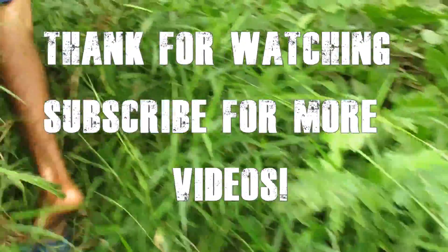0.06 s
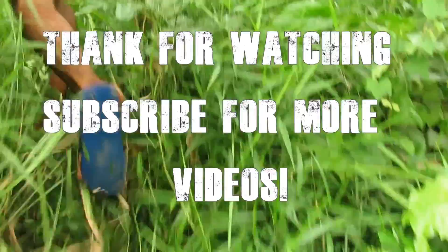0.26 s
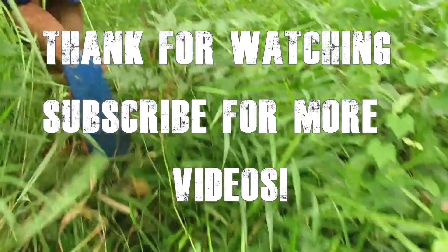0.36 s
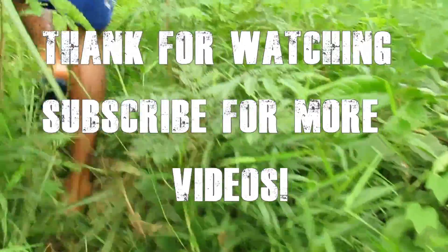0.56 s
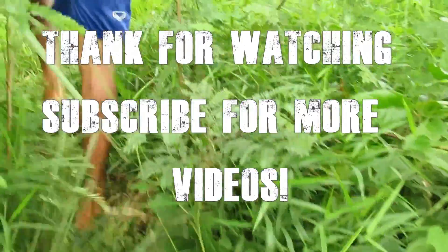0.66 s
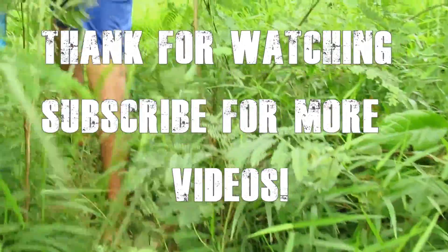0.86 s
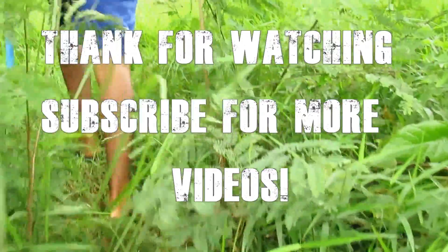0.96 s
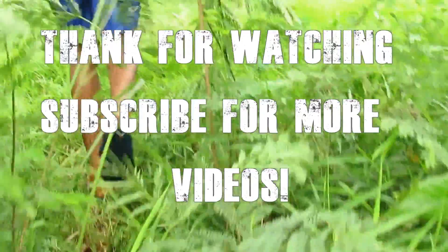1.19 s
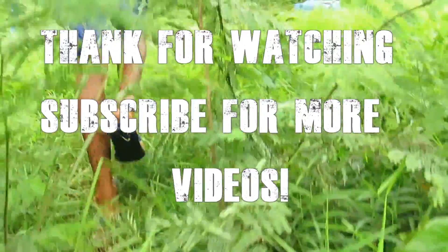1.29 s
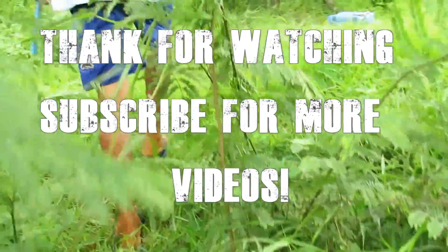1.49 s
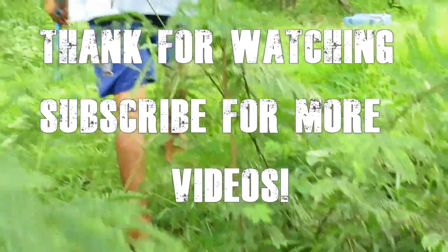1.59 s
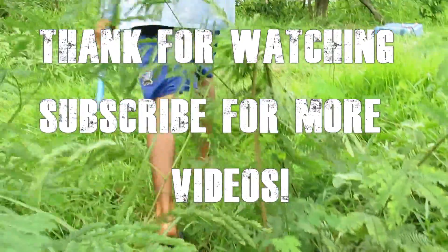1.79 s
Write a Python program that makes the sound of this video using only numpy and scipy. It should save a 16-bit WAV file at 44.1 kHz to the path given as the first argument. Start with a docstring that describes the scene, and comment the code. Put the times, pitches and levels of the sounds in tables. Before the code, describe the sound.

Tall grass swishes and crackles against walking legs, with wind rumbling on the microphone.

```python
"""Tall grass and weeds swish along the legs of someone wading through them.
Stalks bend and rustle, leaf edges scrape and fizz, and stems snap and crunch underfoot.
Moving air buffets the microphone of a hand-held camera close behind in low, lumpy gusts,
and a few jolts add dull thumps. Rubbing and wind are shaped noise; snaps and thumps are short waves."""
import sys
import numpy as np
from scipy import signal
from scipy.fft import rfft, irfft, next_fast_len
from scipy.io import wavfile
from scipy.ndimage import uniform_filter1d, map_coordinates

SR = 44100
rng = np.random.default_rng(int(sys.argv[2]) if len(sys.argv) > 2 else 0)


def pcm_store(signal):
    """Save signal as 16-bit PCM."""
    levels = np.round(np.clip(np.atleast_2d(signal), -1, 1) * 32767)
    wavfile.write(sys.argv[1], SR, levels.astype(np.int16).T)


N = 81585
TOP_HZ = 15750  # highest frequency in the sound


def amp(db):
    """Turn decibels into a number to multiply by."""
    return 10 ** (np.asarray(db) / 20)


def unit(x):
    """Scale a signal to an average size (rms) of 1."""
    return x / np.sqrt(np.mean(x ** 2) + 1e-20)


def along(points, hz):
    """Read between (frequency, value) points on a logarithmic frequency axis."""
    freqs, values = np.transpose(points)
    return np.interp(np.log(hz + 1), np.log(freqs + 1), values)


def since(start):
    """Seconds since a moment, for every sample."""
    return np.arange(N) / SR - start


def curve(rows):
    """Join (time, value) points with straight lines."""
    return np.interp(since(0), *np.transpose(rows))


def wobble(per_s):
    """A smooth curve through per_s random values each second."""
    return map_coordinates(rng.standard_normal(2048), [np.arange(N) * per_s / SR], mode="wrap")


def noise():
    """Two channels of white noise, an even hiss."""
    return rng.standard_normal((2, N))


def filtered(x, response):
    """Multiply each frequency in x by response(frequency)."""
    size = next_fast_len(N + SR // 2)
    return irfft(rfft(x, size) * response(np.fft.rfftfreq(size, 1 / SR)), size)[..., :N]


def spread(pair, tone, likeness):
    """Give two noises a tone and blend them to stereo at rms 1; likeness 1 makes both sides equal."""
    def response(hz):
        angle = np.arccos(np.clip(along(likeness, hz), -1, 1)) / 2
        return amp(along(tone, hz)) * [np.cos(angle), np.sin(angle)]
    mid, side = filtered(pair, response)
    return unit(np.array([mid + side, mid - side]))


def grains(count, hz, scatter, cycles, size_db):
    """Tiny touches, each a fading ring with its own pitch, size and direction."""
    when, strength, direction = np.hsplit(rng.random((count, 3)), 3)
    pitch = np.clip(hz * np.exp(scatter * rng.standard_normal((count, 1))), 200, TOP_HZ)
    size = amp(-size_db * np.log(np.maximum(strength, .02)))
    age = np.arange(SR // 100)  # samples
    turns = pitch * age / SR
    rings = size * np.sqrt(pitch) * np.sin(2 * np.pi * turns) * np.exp(-turns / cycles)
    places = ((when * N).astype(int) + age).ravel()
    shares = np.cos(2 * np.pi * direction), np.sin(2 * np.pi * direction)
    return unit(np.array([np.bincount(places, (rings * share).ravel(), N)[:N] for share in shares]))


def patchy(x, depth_db):
    """Make narrow bands of a hiss swell and fade at random."""
    bands = signal.stft(x, nperseg=1024)[2]
    patches = rng.standard_normal(bands.shape[1:])
    for axis in (0, 1):  # smooth over frequency, then time
        patches = uniform_filter1d(patches, size=4, axis=axis)
    return signal.istft(bands * amp(depth_db * unit(patches)), nperseg=1024)[1][:, :N]


def burst(peak_s, fade_s, rise_s=0.002):
    """Rise quickly to a peak, then die away."""
    t = since(peak_s)
    return np.exp(np.minimum(t / rise_s, -t / fade_s))


# how loudly blades slide along the legs: t/s, relative level/dB
SWISH_LEVELS = [(0, -48), (.09, -47.5), (.17, -50), (.285, -40.5), (.41, -42.5), (.5, -47), (.586, -50),
                (.668, -45), (.87, -49.5), (.995, -46.5), (1.03, -50.5), (1.12, -44), (1.21, -39.5),
                (1.255, -50.5), (1.4, -51), (1.51, -54), (1.6, -50), (1.71, -45.5), (1.85, -45.5)]
# tone of the blades: f/Hz, relative level/dB
BLADE_TONE = [(120, -3), (250, -20), (420, -0.5), (720, 0), (1100, 2), (1900, 2.5), (3200, -2.5),
              (5000, -9.5), (8000, -17.5), (15000, -60)]
# how alike the blades sound left and right: f/Hz, likeness
BLADE_LIKENESS = [(150, 1), (300, 0.99), (600, 0.99), (1200, 0.93), (2500, 1), (5000, 0.32)]


def swish():
    """Blades rub on the legs in uneven slips, with small ticks on top."""
    ticks = amp(-15) * grains(count=2200, hz=1970, scatter=0.93, cycles=1.0, size_db=4)
    rub = noise() + ticks
    level_db = 2.5 + curve(SWISH_LEVELS) + 0.58 * wobble(per_s=59.87)
    return amp(level_db) * spread(patchy(rub, depth_db=1.85), BLADE_TONE, BLADE_LIKENESS)


# how loudly stalks bend near the ground: t/s, relative level/dB
STALK_LEVELS = [(0.0, -51), (0.246, -47.5), (0.488, -48), (0.716, -60.5), (0.972, -54.5), (1.112, -44.5),
                (1.236, -46), (1.364, -60), (1.612, -43.5), (1.766, -46), (1.85, -41)]
# tone of the stalks: f/Hz, relative level/dB
STALK_TONE = [(100, 1.5), (200, 2), (450, -0.5), (750, -11.5), (1200, -9.5), (3000, -23)]


def stalks():
    """Thicker stalks bend and drag with a soft, low rustle."""
    level_db = -1.5 + curve(STALK_LEVELS) + 4.5 * wobble(per_s=44.52)
    return amp(level_db) * spread(noise(), STALK_TONE, BLADE_LIKENESS)


# how loudly leaves brush past each other: t/s, relative level/dB
FIZZ_LEVELS = [(0, -43), (.092, -40), (.14, -45), (.2, -46.5), (.24, -39.5), (.33, -40.3), (.42, -39.5),
               (.59, -42), (.64, -37.5), (.68, -39.5), (.745, -38), (.88, -44.5), (.96, -42), (.995, -39.5),
               (1.075, -47.5), (1.18, -44.5), (1.33, -48.5), (1.45, -53), (1.53, -52.5), (1.65, -52),
               (1.82, -46), (1.85, -47.5)]
# tone of the leaves: f/Hz, relative level/dB
LEAF_TONE = [(400, -5), (1500, -10.5), (3500, 0.5), (5500, -0.5), (8000, -2), (10500, -.5), (13000, 3),
             (14400, 0), (15700, -10.5)]
# how alike the leaves sound left and right: f/Hz, likeness
LEAF_LIKENESS = [(1500, .7), (4000, .38), (8000, .42), (12500, .62)]


def fizz():
    """Leaf edges scrape each other, making a hiss full of fine crackle."""
    crackle = amp(-9.5) * grains(count=2400, hz=9600, scatter=0.37, cycles=0.83, size_db=1.5)
    scrape = noise() + crackle
    level_db = 3 + curve(FIZZ_LEVELS) + 1.07 * wobble(per_s=70.2)
    return amp(level_db) * spread(patchy(scrape, depth_db=2.96), LEAF_TONE, LEAF_LIKENESS)


# gusts on the microphone: t/s, relative level/dB
GUST_LEVELS = [(0, -73), (.07, -61), (.14, -40.5), (.18, -51), (.225, -45), (.25, -34.5), (.28, -30),
               (.295, -42), (.35, -47), (.405, -29), (.44, -43.5), (.485, -38.5), (.505, -30.5), (.61, -30),
               (.655, -27), (.685, -43.5), (.75, -28), (.795, -45), (.83, -40), (.89, -48), (.98, -39.5),
               (1.115, -41.5), (1.15, -39), (1.215, -28.5), (1.245, -26), (1.31, -24.5), (1.345, -24.5),
               (1.385, -29), (1.455, -23.5), (1.48, -34.5), (1.6, -41.5), (1.69, -41), (1.76, -57),
               (1.85, -60)]
# tone of the big swirls of air, then of the small ones: f/Hz, relative level/dB
SWIRL_TONE = [(18, -2.5), (30, -13.5), (45, -0.5), (75, 2.5), (110, -9), (165, -16), (215, -30),
              (300, -39.5), (600, -38), (2000, -93)]
FLUTTER_TONE = [(30, -26), (60, -29), (100, -6), (160, -7), (210, -12.5), (270, -16), (400, -32),
                (1000, -55)]
# how alike each kind sounds left and right: f/Hz, likeness
SWIRL_LIKENESS = [(30, 0.85), (70, 1), (130, 1), (250, 0.32)]
FLUTTER_LIKENESS = [(130, -0.1)]


def wind():
    """Swirls of air roll over the microphone; strong gusts tear into smaller ones that flutter."""
    gust_db = curve(GUST_LEVELS)
    swirls = spread(noise(), SWIRL_TONE, SWIRL_LIKENESS)
    power = uniform_filter1d(np.mean(swirls ** 2, axis=0), size=1400)
    steady_swirls = swirls / np.sqrt(np.abs(power) + 1e-6)  # evened out, so the gusts set the level
    flutter_db = -35 + 1.52 * (gust_db - gust_db.max())  # grows faster than the gust itself
    flutter = amp(flutter_db) * spread(noise(), FLUTTER_TONE, FLUTTER_LIKENESS)
    return amp(0.5 + gust_db) * steady_swirls + flutter


# stems breaking: t/s, relative level/dB, f/Hz
STEM_SNAPS = [(.108, -20.5, 1400), (0.1302, -23, 1180), (0.193, -30, 1500), (0.476, -21.5, 1830),
              (0.556, -32, 1110), (.973, -22, 1230), (0.9964, -20, 930), (1.1957, -18.5, 815),
              (1.367, -28, 890), (1.4236, -31, 1980), (1.5449, -26.5, 1440), (1.65, -32.5, 980),
              (1.776, -27, 710)]


def snaps(width_cycles=0.6, splinter_db=-19, splinter_s=0.034):
    """A stem gives way with one short swing, and its fibres splinter after it."""
    cracks, splinters = np.zeros(N), np.zeros(N)
    for start, db, hz in STEM_SNAPS:
        t = np.maximum(since(start), 0)
        fade = np.exp(-(hz * t / width_cycles) ** 2 / 2)
        cracks += amp(db + 0.5) * np.sin(2 * np.pi * hz * t) * fade
        splinters += amp(db + splinter_db - 60 * t / splinter_s) * (t > 0)
    return cracks + splinters * spread(noise(), BLADE_TONE, BLADE_LIKENESS)


# leaf tips flicking past: t/s, level/dB, f/Hz, fade time/s, band width as a share of f
LEAF_FLICKS = [(0.224, -34, 12500, .012, 0.17), (0.319, -33.5, 9570, 0.016, 0.046),
               (.648, -26, 13000, 0.0038, 0.22), (.6485, -34, 4960, 0.0045, 0.77),
               (0.97, -39.5, 1560, 0.0036, 0.16), (0.997, -37.5, 6100, 0.0054, 0.77),
               (1.282, -43.5, 5300, 0.01, 0.055), (1.371, -39.5, 13000, 0.01, 0.16),
               (1.544, -38.5, 2830, 0.0014, 0.62)]


def flicks():
    """A leaf tip zips past in a short band of hiss."""
    out = np.zeros((2, N))
    hiss = spread(noise(), LEAF_TONE, LEAF_LIKENESS)
    for peak_s, db, hz, fade_s, width in LEAF_FLICKS:
        band = filtered(hiss, lambda f: 1 / (1 + ((f / hz - 1) / width) ** 2))
        out += amp(db) * burst(peak_s, fade_s) * unit(band)
    return out


# jolts on the camera: t/s, relative level/dB, f/Hz, left over right/dB (upper part only)
JOLTS = [(0.2495, -23, 102, 2), (.274, -28, 111, 0), (0.5093, -18.5, 120, 3), (0.558, -20.5, 120, -6),
         (0.5993, -16.5, 108, -2), (0.61, -32, 113, 2), (0.6505, -14.5, 88, 2.5), (0.755, -23.5, 117, -5),
         (1.242, -16.5, 77, 9.5), (1.297, -20, 68, -11), (1.368, -12.5, 73, -7.5), (1.407, -18, 93, -9),
         (1.426, -23, 143, -16), (1.572, -22.5, 157, -5)]


def thumps(width_cycles=0.44, edge=0.12, split_hz=75):
    """Each jolt is one low push and pull; its upper part can lean to one side, its deep part is shared."""
    out = np.zeros((2, N))
    for middle_s, db, hz, lean_db in JOLTS:
        turns = hz * since(middle_s)
        swing = np.sin(2 * np.pi * turns) + edge * np.sin(4 * np.pi * turns)  # an octave up sharpens it
        swell = np.exp(-(turns / width_cycles) ** 2 / 2)
        out -= amp([[db + lean_db / 2], [db - lean_db / 2]]) * swing * swell
    shared = out.mean(axis=0)
    return shared + filtered(out - shared, lambda hz: hz ** 3 / (hz ** 3 + split_hz ** 3))


# stalks crushed underfoot: t/s, level/dB, fade time/s, f/Hz
FOOT_CRUNCHES = [(0.394, -38.5, 0.012, 590), (0.403, -42, 0.026, 595), (0.992, -36.5, 0.0073, 895),
                 (1.191, -30, 0.0078, 534), (1.214, -25.5, 0.0096, 540), (1.37, -29, 0.0033, 620),
                 (1.387, -37.5, 0.013, 460), (1.65, -42, 0.029, 930)]
# tone of one crunch: multiple of its f, relative level/dB
CRUNCH_TONE = [(.3, -23), (.65, -4), (1, 1), (1.45, -14.5), (2.2, -12.5), (4, -40), (8, -55), (24, -56)]


def crunches():
    """A foot flattens a clump of juicy stalks in a short burst of noise."""
    out = np.zeros((2, N))
    for peak_s, db, fade_s, hz in FOOT_CRUNCHES:
        tone = [(multiple * hz, level) for multiple, level in CRUNCH_TONE]
        out += amp(db) * burst(peak_s, fade_s) * spread(noise(), tone, BLADE_LIKENESS)
    return out


# how far the left side's wave runs ahead of the right's: f/Hz, lead/radians
LEFT_LEAD = [(1500, .05), (3100, 0.23), (6000, 0.2), (7500, 1.1), (10000, 1.54), (12000, 2.2), (15300, 2.3)]


def from_left(grass):
    """The grass reaches the left side of the microphone first, and a little louder."""
    sides = np.array([[1], [-1]])
    return filtered(grass, lambda hz: amp(.25 * sides) * np.exp(.5j * along(LEFT_LEAD, hz) * sides))


def scene():
    """Open air, no echo: the grass is close by; wind and thumps are on the microphone itself."""
    grass = swish() + stalks() + fizz() + snaps() + flicks() + crunches()
    return from_left(grass) + wind() + thumps()


def record(dry):
    """The camera keeps nothing above its highest frequency."""
    return filtered(dry, lambda hz: hz < TOP_HZ)


dry = scene()
out = record(dry)
pcm_store(out)
```